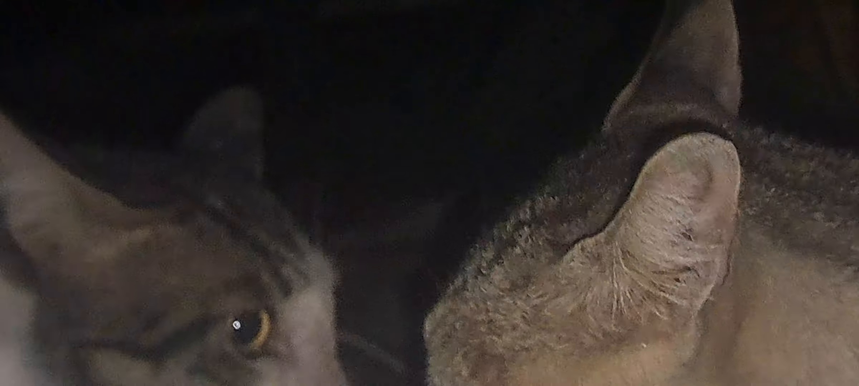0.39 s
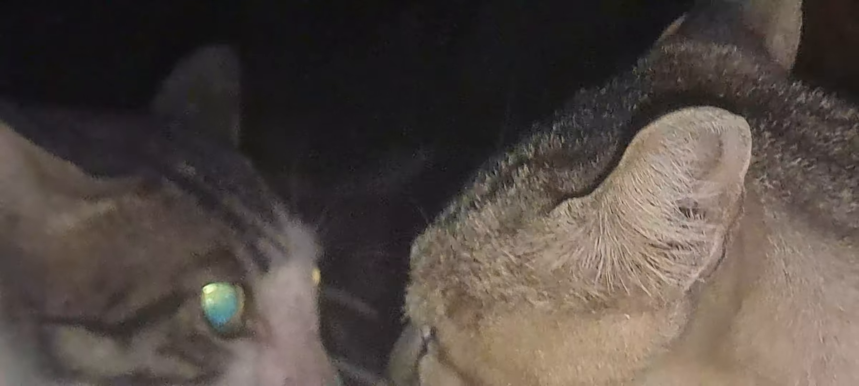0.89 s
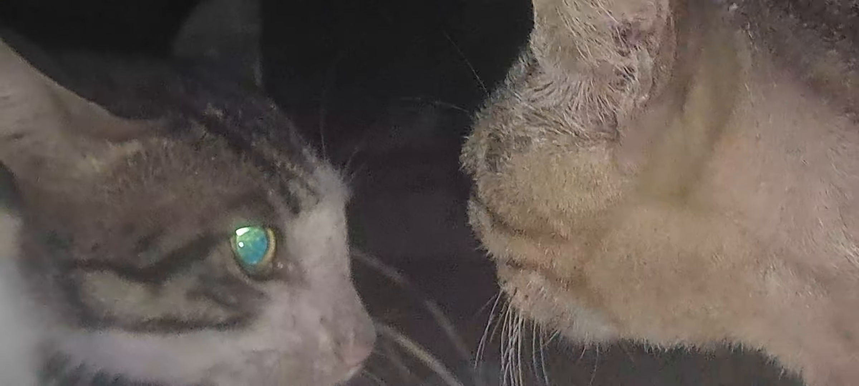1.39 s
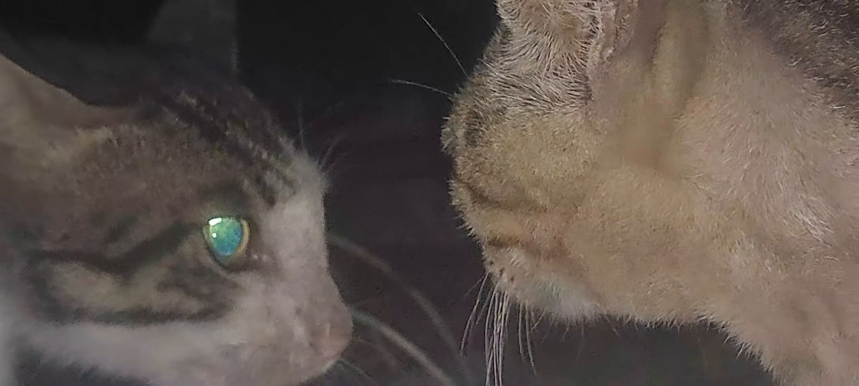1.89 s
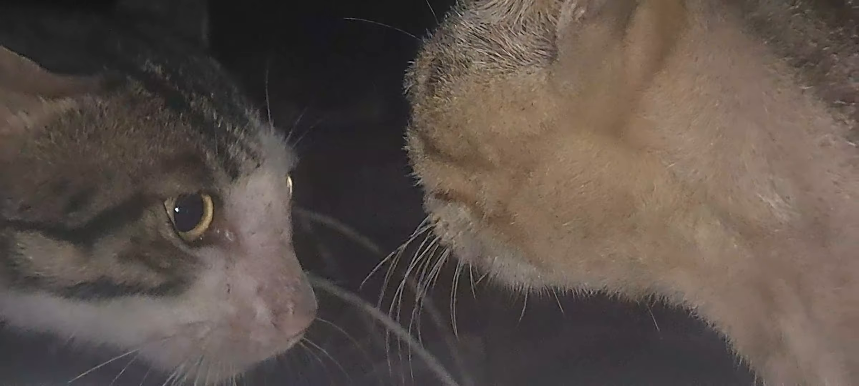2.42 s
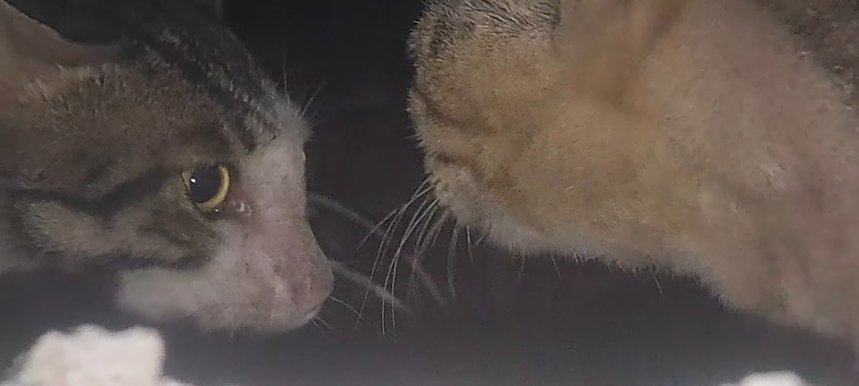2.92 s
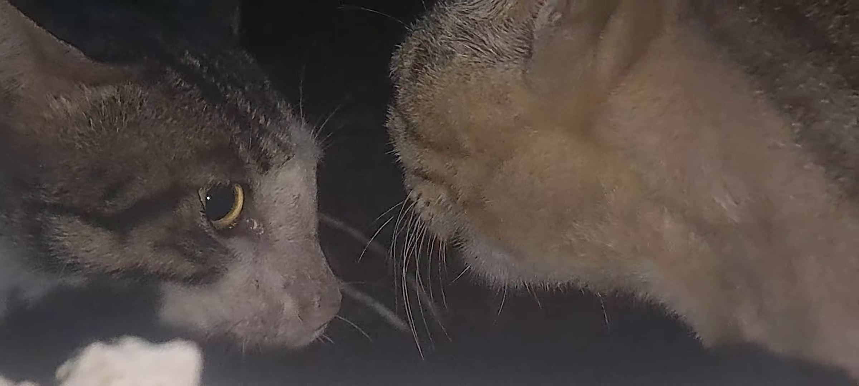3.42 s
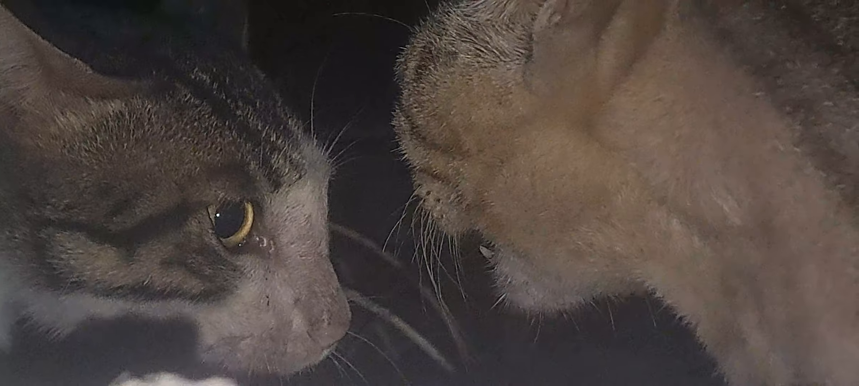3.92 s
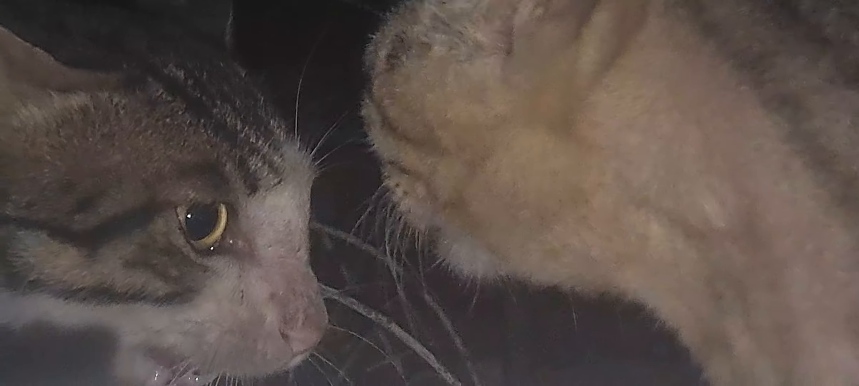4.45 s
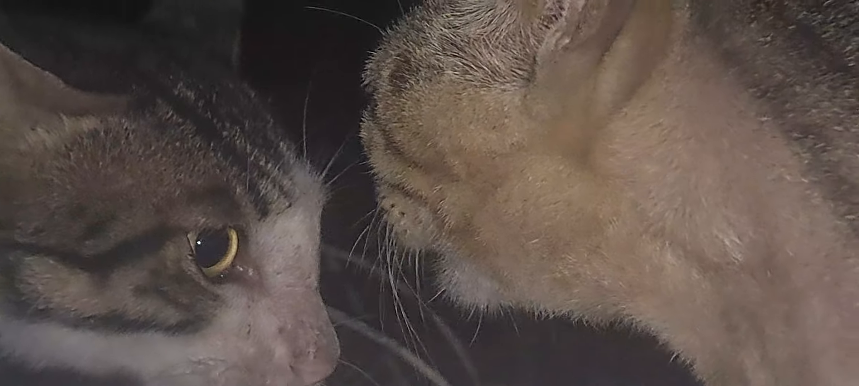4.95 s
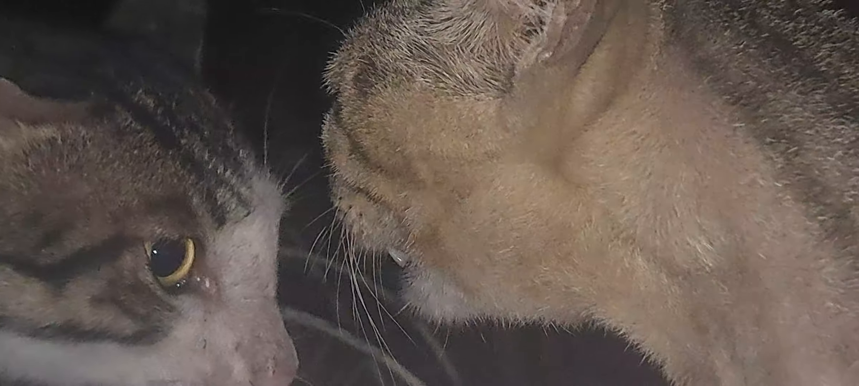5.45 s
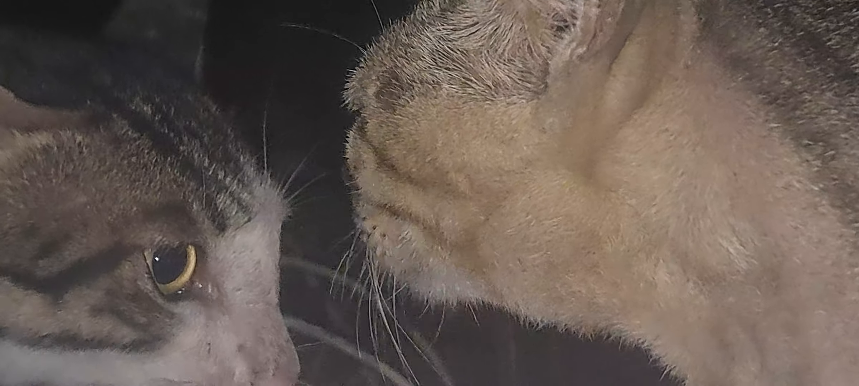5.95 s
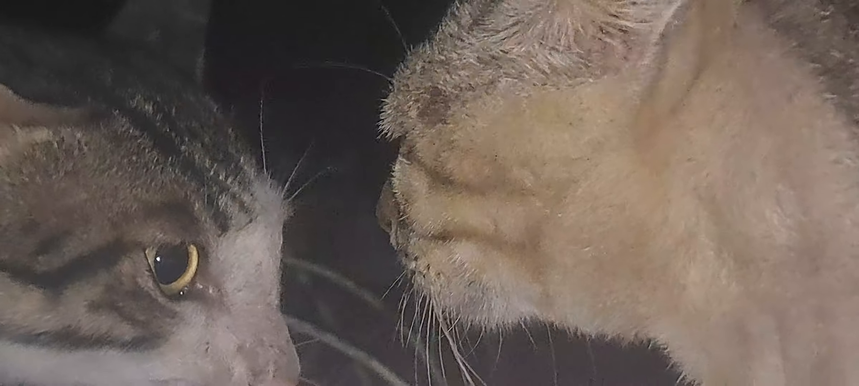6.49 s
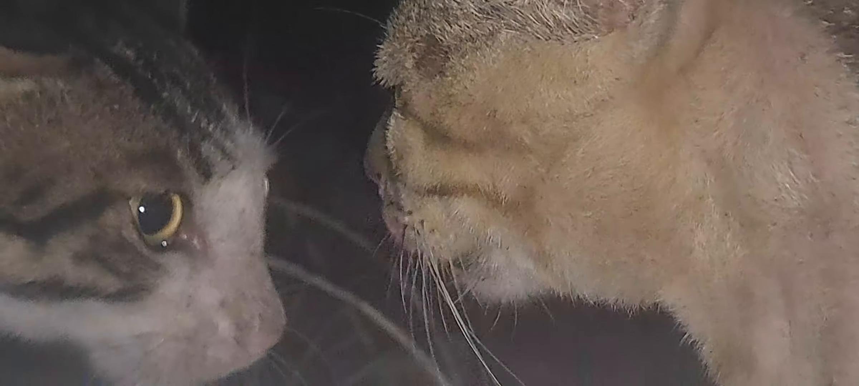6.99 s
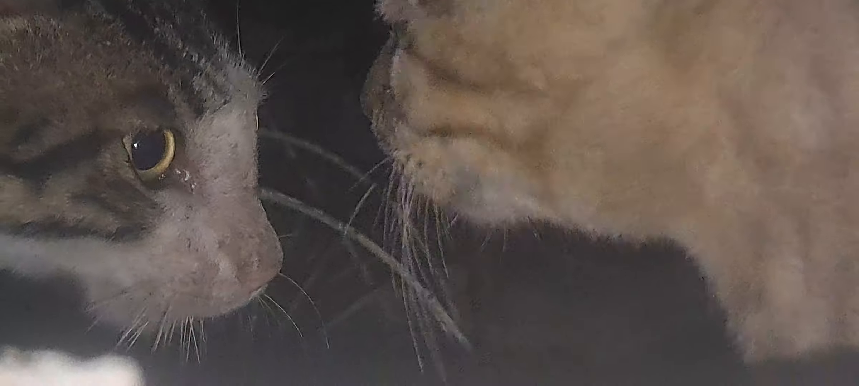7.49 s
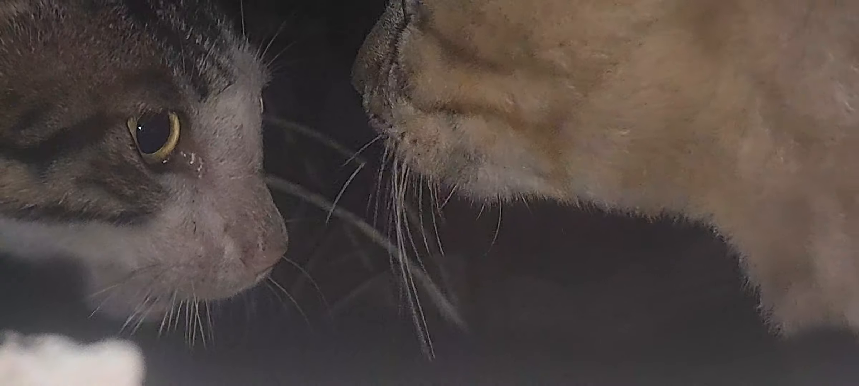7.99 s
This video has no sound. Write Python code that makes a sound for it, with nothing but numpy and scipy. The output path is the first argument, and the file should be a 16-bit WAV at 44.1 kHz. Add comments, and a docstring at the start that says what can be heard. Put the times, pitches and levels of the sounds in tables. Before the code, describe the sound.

Two cats confront each other outside at night. The nearer one gives drawn-out, nasal yowls that climb, hold and drop, two early, then a lull of mostly wind, then three more and the start of another. A second cat adds thin, pure hums and moans. Wind thumps and rumbles on the close microphone; the treble is muffled, with faint hiss.

```python
"""Outdoors at night, open to the wind: two cats face off, one near the microphone and one farther away.
The near one yowls in long arcs, summed partials shaped by mouth and throat as the pitch climbs; the other
holds thin, closed-mouth moans and hums of one to three partials. Wind buffets the microphone: coloured noise
in lumps, gusts and lulls. Everything above a moving edge is cut down; a faint hiss and dry puffs lie over it."""
import sys
import numpy as np
from scipy import signal
from scipy.fft import rfft, irfft, next_fast_len
from scipy.io import wavfile
from scipy.ndimage import uniform_filter1d

SR = 44100
rng = np.random.default_rng(int(sys.argv[2]) if len(sys.argv) > 2 else 0)


def elevation(decibels):
    """Turn decibel levels (scalar or array-like) into linear amplitude ratios."""
    levels = np.asarray(decibels, float)
    return 10 ** (levels / 20)


def master(y):
    """Save y as 16-bit WAV."""
    cut = np.clip(np.atleast_2d(y).T, -1, 1)
    pcm = np.round(cut * 32767)  # scale
    wavfile.write(sys.argv[1], SR, pcm.astype(np.int16))


N = 358090
T = np.arange(N) / SR


def rms_one(x):
    """Scale to unit rms."""
    return x / np.sqrt(np.mean(x ** 2) + 1e-20)


def in_time(rows, t):
    """Columns of a curve, read at points t of its first column."""
    s, *columns = np.transpose(rows)
    return [np.interp(t, s, c) for c in columns]


def drift(hz, size):
    """Noise twice through a one-pole low-pass at hz; rms 1."""
    r = np.exp(-2 * np.pi * hz / SR)
    noise = rng.standard_normal(size + 4000)
    return rms_one(signal.lfilter([1], [1, -2 * r, r * r], noise)[4000:])


def coloured(points, x):
    """Weight x by a spectrum of (frequency [Hz], density [dB per Hz]); rms 1."""
    hz, db = np.transpose(points)
    size = next_fast_len(N)
    f = np.arange(size // 2 + 1) * SR / size + 1
    gain = elevation(np.interp(np.log(f), np.log(hz), db, -120, -120))
    return rms_one(irfft(rfft(x, size) * gain, size)[:N])


def bells(s, length_s, height):
    """Sum of rounded bumps centred at s, length_s wide where they are down to 1/e."""
    t = T[::64]   # a coarse clock is enough
    bumps = np.exp(-(2 * (t - s[:, None]) / length_s[:, None]) ** 2)
    return np.interp(T, t, height @ bumps)


def span(rows, fade_s):
    """Sample slice, times and faded window of one call."""
    at = slice(int(rows[0][0] * SR), min(int(rows[-1][0] * SR), N))
    t = T[at]
    return at, t, np.clip(np.minimum(t - t[0], t[-1] - t) / fade_s, 0, 1)


def peak(hz, centre_hz, width_hz):
    """Gain of a resonance applied twice."""
    return 1 / (1 + (2 * (hz - centre_hz) / width_hz) ** 2)


# the wind between gusts: (time [s], rumble [dB], rustle [dB])
WIND = [(0, -49, -55.5), (.4, -44, -57.5), (.6, -36.5, -55.5), (.76, -49, -50.5), (.82, -26, -66),
        (.98, -35, -64.5), (1.2, -44, -56.5), (1.45, -35.5, -63.5), (2.1, -49, -58.5), (2.42, -49, -55),
        (2.48, -32, -68.5), (2.76, -40, -73), (2.85, -50, -69), (3.17, -47, -65.5), (3.22, -30, -72),
        (3.46, -19.5, -55), (3.54, -42, -56), (4.0, -42, -51), (4.15, -48, -67.5), (4.95, -49.5, -61.5),
        (5.2, -46.5, -60), (5.5, -44.5, -54.5), (6.0, -40.5, -54), (6.7, -48, -57.5), (6.91, -47.5, -50.5),
        (7.08, -44, -55), (7.2, -45.5, -67), (7.92, -52, -66), (8.1, -29.5, -54)]
# gusts at the microphone: (centre time [s], length [s], rumble [dB], buffeting over rumble [dB])
GUSTS = [(0.036, 0.024, -49.5, 21.5), (0.322, 0.037, -42.5, -1), (0.515, 0.13, -31, -22.5),
         (0.722, 0.043, -30, -6), (0.961, 0.073, -26.5, -5.5), (1.112, 0.065, -31.5, -10),
         (1.282, 0.034, -38, -7), (1.44, 0.06, -32, -22.5), (1.684, 0.02, -43.5, 5),
         (1.807, 0.092, -38.5, -12.5), (1.931, 0.05, -39.5, -5), (2.017, 0.029, -28, -4),
         (2.075, 0.035, -29.5, -6), (2.26, 0.047, -36.0, -18), (2.6, 0.21, -37.5, -9),
         (3.253, 0.063, -35.5, -2.5), (3.42, 0.14, -35, 10.5), (3.833, 0.045, -24.5, -4),
         (3.979, 0.061, -27.4, 2.8), (4.181, 0.046, -45, 5.5), (4.281, 0.044, -36.4, -3),
         (4.449, 0.051, -32, -5), (4.658, 0.038, -42.5, -8.5), (4.89, 0.14, -42.5, -6),
         (5.006, 0.023, -46, -17), (5.194, 0.031, -51, -3), (5.362, 0.094, -38, -7),
         (5.547, 0.03, -38, -2.5), (5.803, 0.063, -28.5, -0.3), (6.264, 0.047, -31, -17.5),
         (6.389, 0.021, -60, 8.5), (6.431, 0.034, -37.6, -6), (6.518, 0.057, -32, -12),
         (6.67, 0.087, -34, -3.5), (7.063, 0.043, -33.5, -8.5), (7.277, 0.076, -54, -3),
         (7.519, 0.046, -42, -9), (7.587, 0.029, -43.5, -6), (7.714, 0.1, -37, -3)]
# lulls in the breeze: (centre time [s], length [s], depth [dB])
LULLS = [(0.123, 0.033, -8), (2.175, 0.056, -5), (2.368, 0.045, -3), (2.912, .09, -25.5),
         (3.073, 0.065, -9), (4.12, 0.11, -4.5), (6.93, 0.017, -1.5), (7.151, 0.095, -36),
         (7.342, 0.078, -19.5)]
# relative spectra of the low, middle and high wind noise: (frequency [Hz], density [dB per Hz])
RUMBLE = [(18, -40.5), (30, -21.5), (57, -1.5), (90, -2), (150, -4), (230, -12.5), (400, -37.5)]
BUFFETING = [(100, -18), (200, 0.5), (350, -3.5), (600, -11), (1000, -29.5), (2000, -62.5)]
RUSTLE = [(300, -2), (600, -4.5), (900, -2), (1400, -14), (2500, -29), (7000, -44)]


def wind(yowl_swell):
    """Eddies hit the microphone in lumps, which all layers share; gusts and lulls ride on the breeze."""
    buffeting_under_rumble_db = -3.5   # between gusts
    rustle_of_wind_db, rustle_of_yowl_db = -33.5, -15.5   # rustle swells with buffeting and with the yowls
    s, length_s, gust_db, bright_db = np.transpose(GUSTS)
    calm = elevation(bells(*np.transpose(LULLS)))
    rumble_db, rustle_db = in_time(WIND, T)
    breeze = elevation(rumble_db) * calm
    low = breeze + bells(s, length_s, elevation(gust_db))
    mid = elevation(buffeting_under_rumble_db) * breeze + bells(s, length_s, elevation(gust_db + bright_db))
    high = elevation(rustle_db) * np.sqrt(calm)   # lulls are half as deep in dB here
    high += elevation(rustle_of_wind_db) * mid + elevation(rustle_of_yowl_db) * yowl_swell

    lumps = np.clip(drift(22.2, N), -3, 1.8)
    rumble = coloured(RUMBLE, elevation(4.3 * lumps) * rng.standard_normal(N))
    buffeting = coloured(BUFFETING, elevation(3.7 * lumps + 3.7 * drift(25, N)) * rng.standard_normal(N))
    rustle = coloured(RUSTLE, elevation(4.2 * lumps + 2.7 * drift(40, N)) * rng.standard_normal(N))
    return low * rumble + mid * buffeting + high * rustle


# thin hums of the far cat: (time [s], pitch [Hz], level [dB])
HUMS = [
    [(0.0, 747.1, -47.5), (0.156, 753.4, -41), (0.238, 729, -24), (0.306, 703.4, -23.5), (0.334, 710, -35),
     (0.35, 764.5, -31)],
    [(0.5, 663.8, -71.5), (0.648, 624.1, -49), (0.702, 581.4, -34.5), (0.792, 509.3, -57),
     (0.914, 553, -35), (0.952, 524, -50), (1.082, 574.3, -58), (1.2, 542, -42)],
    [(4.3, 936, -64), (4.526, 742, -55.5), (4.724, 720.7, -55), (4.744, 801, -47.5), (4.828, 782.1, -50),
     (4.87, 705, -54), (4.904, 770, -40.5), (4.984, 732, -69.5), (5.17, 639, -58)],
]
# the far cat's moan: (time [s], pitch [Hz], first partial [dB], second partial [dB])
MOANS = [
    [(5.15, 627, -62.5, -78), (5.25, 697, -59, -59.5), (5.292, 709.4, -50.5, -41), (5.365, 751, -63, -67),
     (5.402, 745, -66, -38.5), (5.492, 774, -45, -39.5), (5.61, 777, -58, -48.5), (5.635, 796, -35, -54),
     (5.694, 775, -46, -34.5), (5.73, 790, -44.5, -47.5), (5.78, 817, -22.5, -26.5)],
]
# single soft tones leading into a yowl or sinking after it:
# (start time [s], length [s], first pitch [Hz], last pitch [Hz], peak level [dB])
SIGHS = [(0.877, 0.29, 452, 438, -35), (2.042, 0.26, 530, 360, -42), (4.738, 0.27, 510, 366, -42),
         (6.498, .37, 555, 365, -36.5), (7.7, 0.27, 530, 775, -52.5)]


def thin_tones(wobble, shimmer, breath):
    """Closed mouth: one to three nearly pure partials, each flickering and a little breathy."""
    third_under_second_db = -29
    moans = [[(*row, row[-1] + third_under_second_db) for row in rows] for rows in MOANS]
    sigh_shape = ((0, -19), (0.18, 0), (1, -16))   # (share of the length, level [dB] under the peak)
    sighs = [[(s + u * length_s, first + u * (last - first), db + under) for u, under in sigh_shape]
             for s, length_s, first, last, db in SIGHS]
    out = np.zeros(N)
    for rows in moans + HUMS + sighs:
        at, t, window = span(rows, fade_s=.02)
        pitch, *levels_db = in_time(rows, t)
        phase = 2 * np.pi * np.cumsum(pitch * (1 + wobble * drift(30, len(t)))) / SR
        for k, db in enumerate(levels_db):
            flicker = elevation(shimmer * drift(26, len(t)))
            flicker = flicker + breath * (1 + k) * drift(290, len(t))
            out[at] += window * np.sqrt(2) * elevation(db) * flicker * np.sin((k + 1) * phase)
    return out


# relative spectrum of the hiss: (frequency [Hz], density [dB per Hz])
HISS = [(500, 0), (2000, 1), (3500, -4), (4600, 1), (5000, 2.5), (6300, 3.5), (7000, -0.5), (8000, 0),
        (10000, -1.5), (11000, -9), (15600, -8)]


def hiss(sound):
    """Faint bright noise that sinks when the rest of the sound is quiet."""
    top_db, knee_db, follows, memory_s = -77.5, -34, 0.36, 0.088   # follows: dB per dB under the knee
    power = np.abs(uniform_filter1d(sound ** 2, int(memory_s * SR)))
    level_db = 10 * np.log10(power + 1e-12)
    gain = elevation(top_db + follows * np.minimum(level_db - knee_db, 0))
    return gain * coloured(HISS, rng.standard_normal(N))


# near cat, one list a yowl:
# (time [s], pitch [Hz], level [dB], mouth resonance [Hz], throat over level [dB])
YOWLS = [
    [(.24, 242, -41.5, 780, -39), (.27, 287, -32, 810, -35.5), (.3, 322.2, -31, 830, -22.5),
     (.33, 422, -27.5, 1001, -14.5), (.364, 443.7, -30.5, 1406, -1.5), (.41, 485, -35, 1455, 5),
     (.48, 539.4, -27, 1508, -3.5), (.52, 550.5, -25, 1455, -5), (.575, 558, -26.5, 1600, -8.5),
     (.63, 539, -27, 1550, -10), (.69, 498, -28, 900, -24.5), (.706, 470, -20.5, 880, -52),
     (.73, 447, -35.5, 910, -30), (.79, 460, -57, 920, -9)],
    [(.9, 444, -63.5, 820, -39), (1.14, 452, -53.5, 875, -48), (1.194, 450, -35, 843, -54),
     (1.23, 414, -26.5, 844, -74), (1.31, 450, -28.5, 820, -24), (1.358, 459, -27, 910, -40),
     (1.432, 482.5, -34, 1130, -12), (1.468, 489.4, -49, 1243, 7.5), (1.51, 506, -28.5, 1360, -10.5),
     (1.57, 510.5, -32, 1360, -8), (1.61, 552.7, -28, 1456, -6.5), (1.74, 556.4, -24, 1474, -4.5),
     (1.85, 521.5, -24.5, 1490, -23.5), (1.878, 516, -43.5, 1540, -20), (1.9, 511.7, -22.5, 1480, -35),
     (1.988, 486, -49, 1000, -12), (2.03, 460, -24, 890, -36), (2.076, 424.3, -20.5, 830, -42.5),
     (2.17, 422, -55.5, 844, -31)],
    [(3.5, 336, -62.5, 729, -33), (3.524, 350.6, -69, 738, -33), (3.558, 362.4, -37.5, 752, -58),
     (3.698, 416.5, -26.5, 835, -40), (3.758, 438.4, -29.5, 866, -36), (3.826, 460.4, -29, 886, -15),
     (3.888, 460.3, -29.5, 917, -10), (3.974, 457.8, -26, 887, -15), (4.004, 449, -33.5, 874, -14.5),
     (4.05, 432, -20.5, 845, -60), (4.098, 440, -49, 825, -33), (4.13, 463.7, -66, 853, -37)],
    [(4.19, 432, -90, 860, -16.5), (4.216, 428, -28, 840, -52), (4.236, 434.4, -29.5, 855, -56),
     (4.295, 457, -43.5, 856, -23.5), (4.32, 470.3, -56.5, 1100, -31), (4.365, 506, -38.5, 1560, -21),
     (4.43, 553, -36, 1625, -40), (4.455, 567, -27.5, 1550, -24), (4.51, 571.4, -40.5, 1520, -35),
     (4.55, 560.2, -31, 1430, -24.5), (4.59, 551.5, -29.5, 1630, -9.5), (4.68, 517.5, -24, 1600, -19.5),
     (4.714, 492, -40.5, 1500, -26), (4.73, 477, -28, 933, -28), (4.774, 434, -21, 835, -55),
     (4.87, 436, -55.5, 833, -35), (4.9, 411, -42.5, 781, -45.5), (4.95, 384, -61, 772, -36)],
    [(5.61, 254.4, -55, 1050, -20), (5.646, 290.7, -29.5, 1110, -48), (5.69, 338.2, -33, 1190, -26.5),
     (5.77, 414.6, -31, 1085, -43), (5.82, 428.3, -28.5, 1157, -13), (5.93, 463.5, -35, 1090, -26),
     (5.99, 472.3, -26, 1227, -30), (6.03, 481.5, -47.5, 1314, -10), (6.066, 497.5, -22.5, 1610, -13),
     (6.1, 541, -30.5, 1490, -15), (6.18, 582.5, -41.5, 1580, -24), (6.216, 603.4, -33, 1780, -6.5),
     (6.256, 609.6, -35, 1721, -2.5), (6.39, 605, -28, 1696, -11), (6.442, 572, -24, 1520, -30.5),
     (6.515, 495, -34, 980, -23), (6.536, 469.6, -21, 915, -42), (6.62, 457, -56, 953, -7.5)],
    [(7.93, 351, -55.5, 731, -56.5), (8.002, 352.3, -30.5, 736, -63), (8.026, 358, -27.5, 715, -74),
     (8.12, 396, -27, 737, -40.5)],
]
# a second, higher tone sounds with the near yowl, and its sum and difference tones with the yowl's partials
# ring along: (time [s], frequency [Hz], depth [0-1])
SECOND_VOICE = [(6.04, 1010, 0), (6.08, 1030, .35), (6.16, 1060, .3), (6.19, 1070, .9), (6.25, 1077, .9),
                (6.38, 1079, .9), (6.42, 1082, .6), (6.46, 1082, 0)]
# companions of the throat resonance: (ratio to it [1], width [Hz], level [dB])
THROAT_COMPANIONS = [(1.19, 350, -7), (.8, 910, -7)]
# faint fixed resonances of the airy top: (frequency [Hz], width [Hz], level [dB])
AIRY_TOP = [(4000, 700, 0), (4900, 900, -10), (6200, 1500, -16)]


def throat_resonance(pitch, mouth_hz, depth):
    """The throat resonance rises as the mouth opens and while the pitch climbs."""
    shut_hz, per_mouth_hz, mouth_shut_hz = 2270, 0.8, 855
    per_rise_s, rise_most_hz = 0.21, 450   # Hz per Hz/s of climb, up to a limit
    beating_hz = 3270   # where the throat rings while both vibrations sound
    rise = uniform_filter1d(np.gradient(pitch) * SR, size=2000)
    throat_hz = shut_hz + per_mouth_hz * (mouth_hz - mouth_shut_hz)
    throat_hz = throat_hz + np.clip(per_rise_s * rise, 0, rise_most_hz)
    return np.where(depth > .5, beating_hz, throat_hz)


def throat_gain(hz, throat_hz):
    """The throat resonance, its companions and the airy top."""
    main = peak(hz, throat_hz, 110) / (1 + (hz / 3700) ** 20)
    beside = sum(elevation(db) * peak(hz, k * throat_hz, w) for k, w, db in THROAT_COMPANIONS)
    beside = beside / (1 + (hz / 3600) ** 20)
    top = sum(elevation(db) * peak(hz, c, w) for c, w, db in AIRY_TOP)
    top = elevation(-32) * top * (hz > 3600)
    return main + beside + top


def near_cat(wobble, shimmer, breath):
    """Partials of the folds, and their sums with a second tone, weighted by mouth and throat. Also returns how
    strongly the rustle swells with the yowls."""
    mouth_width_hz, fundamental_db = 420, -20.5
    swell_follows_upper = 0.27   # dB per dB: the rustle swells less when the upper partials are weak
    out, yowl_swell = np.zeros(N), np.zeros(N)
    second_hz, depth_all = in_time(SECOND_VOICE, T)
    second_phase_all = 2 * np.pi * np.cumsum(second_hz) / SR
    for rows in YOWLS:
        at, t, window = span(rows, fade_s=0.003)
        pitch, level_db, mouth_hz, upper_db = in_time(rows, t)
        depth, second_phase = depth_all[at], second_phase_all[at]
        throat_hz = throat_resonance(pitch, mouth_hz, depth)
        pitch = pitch * (1 + wobble * drift(30, len(t)))
        phase = 2 * np.pi * np.cumsum(pitch) / SR
        # an open throat lifts the partials beside the mouth resonance
        skirt = 0.0074 + .12 * elevation(np.minimum(upper_db, -8))
        # weak stretches are breathier
        hoarse = breath * elevation(0.29 * np.clip(-25.5 - level_db, 0, 30))

        # (multiple of the first vibration, multiple of the second)
        pairs = [(m, 0) for m in range(2, 19)]
        if depth.max() > 0:
            pairs += [(m, n) for n in range(1, 5) for m in range(-2, 7)]
            pairs += [(m, -1) for m in range(4, 9)]
        # small starting values: the powers are divided by below
        low, high, low_power, high_power = np.outer([0.00046, 0.0081, 0.12, 0.0079], np.ones(len(t)))
        for m, n in pairs:
            on = depth > 0 if n else slice(None)   # sums sound only with the second vibration
            hz = m * pitch[on] + n * second_hz[at][on]
            if n:
                share = depth[on] * .85 ** abs(n)
            else:
                share = 1 - .6 * depth[on] * (m > 3)
            # each partial flickers slowly on its own; turbulent air spreads noise around it
            flicker = elevation(shimmer * drift(25, len(hz)))
            flicker = flicker + hoarse[on] * (1 + (hz / 3000) ** 2) * drift(250, len(hz))
            wave = flicker * np.sin(m * phase[on] + n * second_phase[on] + rng.normal(0, 0.83))
            # the mouth shapes partials below 2 kHz, the throat those above
            a = share * (peak(hz, mouth_hz[on], mouth_width_hz) + skirt[on]) * (hz < 2000) * (hz > 300)
            b = share * throat_gain(hz, throat_hz[on]) * (hz >= 2000)
            low[on] += a * wave
            high[on] += b * wave
            low_power[on] += a * a / 2
            high_power[on] += b * b / 2

        voice = low / np.sqrt(low_power) + elevation(upper_db) * high / np.sqrt(high_power)
        voice = voice + elevation(fundamental_db) * np.sin(phase)
        out[at] = window * elevation(level_db) * voice
        yowl_swell[at] = window * elevation(level_db + swell_follows_upper * np.minimum(upper_db, 0))
    return out, yowl_swell


# brief dry puffs of hiss near 6 kHz: (time [s], level [dB, before a 12 dB cut], length [s])
PUFFS = [(0.7666, -43.5, 0.0099), (0.9188, -45.5, 0.016), (0.939, -39.5, 0.013), (1.177, -46.5, 0.012),
         (1.2, -42.5, 0.0081), (1.2565, -45.5, 0.012), (1.277, -53, 0.016), (3.2074, -48, 0.015),
         (3.318, -50, 0.016), (3.721, -47, 0.022), (4.171, -47.5, 0.028), (5.28, -63, 0.0081)]
# relative spectrum of the puffs: (frequency [Hz], density [dB per Hz])
PUFF_COLOUR = [(3800, -21), (4500, -15.5), (5200, -7), (6000, 1), (6600, -8.5), (7100, -20)]


def puffs():
    """Quick rise, rounded fall, on bright noise."""
    shape = np.zeros(N)
    for s, db, length_s in PUFFS:
        u = np.clip((T - s + .003) / max(length_s, .003), 0, 30)   # starts 3 ms ahead
        shape += elevation(db - 12.0) * u * np.exp(1 - u * u)
    return shape * coloured(PUFF_COLOUR, rng.standard_normal(N))


# the edge lies where the spectrum sinks under this level: (frequency [Hz], level [dB])
PASS_DB = [(500, -91.5), (900, -77.5), (1150, -71), (1600, -73.5), (2500, -73.5), (4000, -81.5),
           (6300, -87), (7200, -48.5)]


def band_edge(x, knee, fall_db, widest_hz):
    """Short spectra fall away steeply from a knee just under the highest band that is loud enough."""
    soft_db = 4.5
    f, t, z = signal.stft(x, SR, nperseg=512, noverlap=384)
    power = uniform_filter1d(abs(z) ** 2, size=15, axis=1)
    excess_db = 10 * np.log10(power + 1e-16) - in_time(PASS_DB, f[:, None])[0]
    reached_db = np.maximum.accumulate(excess_db[::-1], axis=0)   # from the top band down
    bands = np.clip(reached_db / soft_db + .5, 0, 1).sum(axis=0)
    edge_hz = f[1] * (bands + 4.5)
    over = f[:, None] / edge_hz - 1 + knee * np.minimum(1, widest_hz / edge_hz)
    gain = elevation(-fall_db * np.clip(over, 0, 2))
    return signal.istft(z * gain, SR, nperseg=512, noverlap=384)[1][:N]


def scene():
    """Cats and wind under the edge, hiss and puffs beside it."""
    yowls, yowl_swell = near_cat(wobble=0.0059, shimmer=3.2, breath=.14)
    tones = thin_tones(wobble=0.0016, shimmer=1.2, breath=0.24)
    shared_flutter = elevation(1.2 * drift(54, N))   # a fast flutter in the level passed by the noise suppressor
    cats = (yowls + tones) * shared_flutter
    inside = band_edge(cats + wind(yowl_swell), knee=0.24, fall_db=119.5, widest_hz=1350)
    return (inside + hiss(inside) + puffs())[None]


def roll_off(x):
    """The treble ends steeply here."""
    return signal.sosfilt(signal.butter(12, 15720, fs=SR, output="sos"), x)


def record(dry):
    """The finished mix as it is kept."""
    return roll_off(dry)


dry = scene()
out = record(dry)
master(out)
```